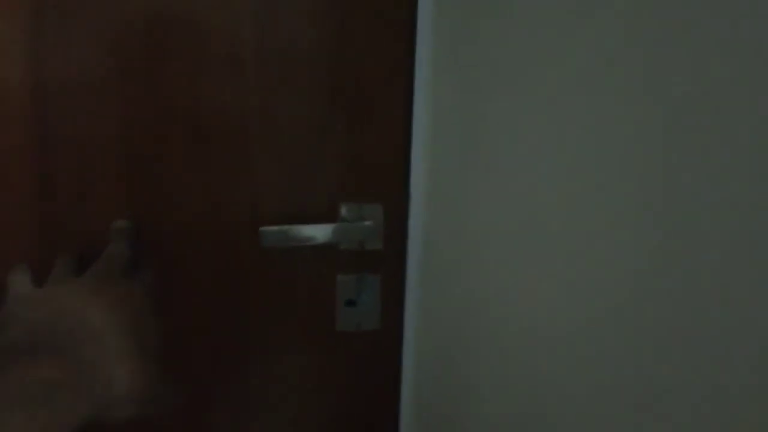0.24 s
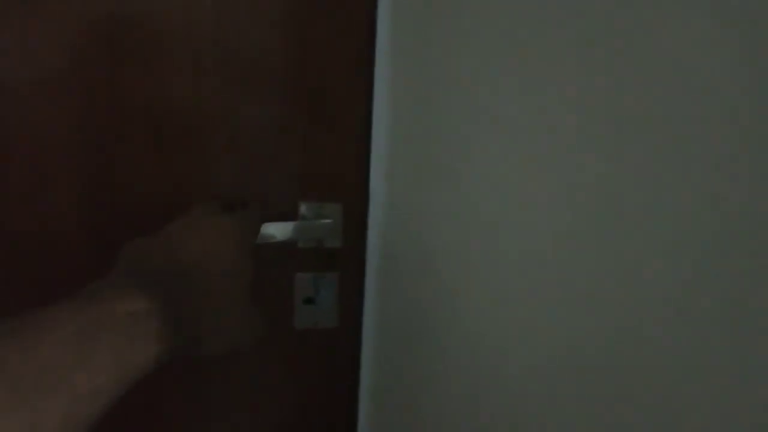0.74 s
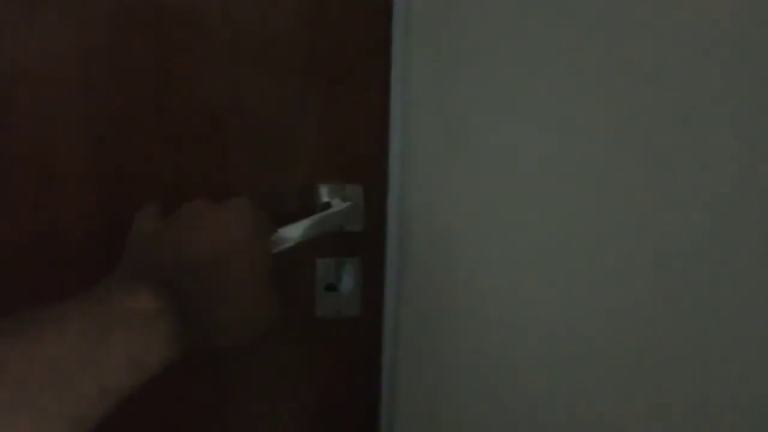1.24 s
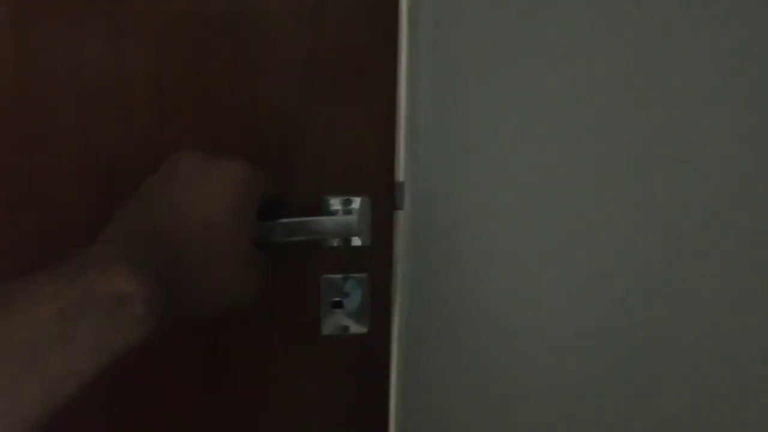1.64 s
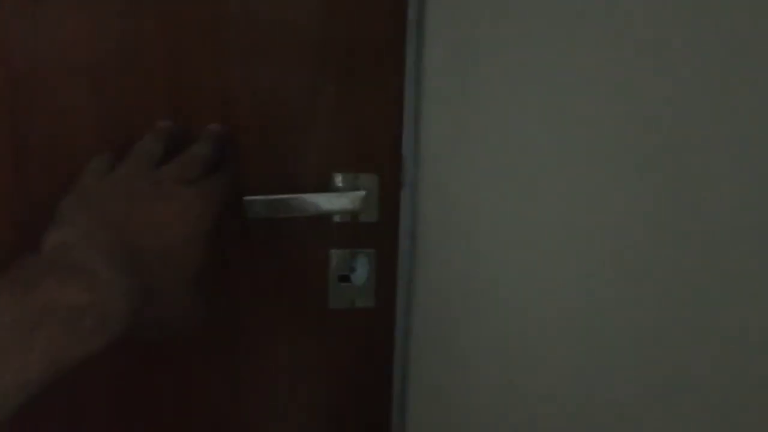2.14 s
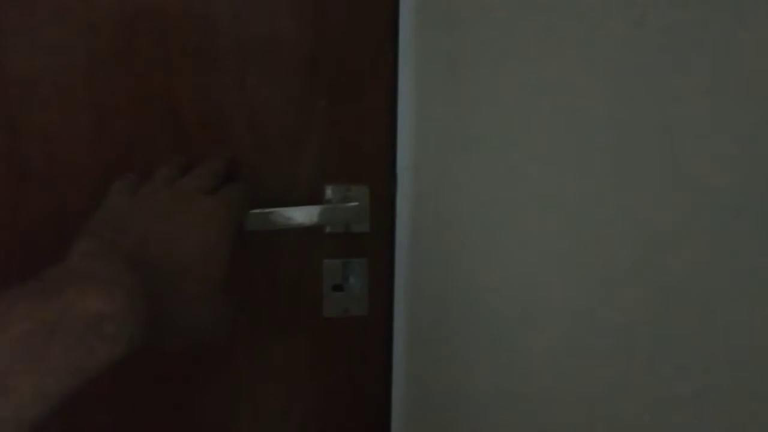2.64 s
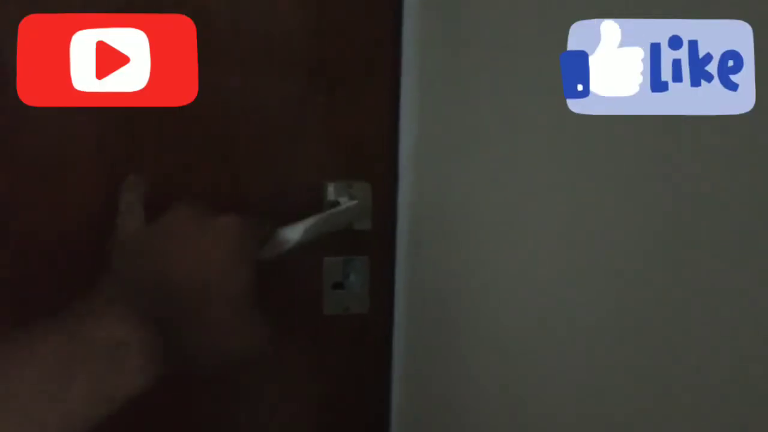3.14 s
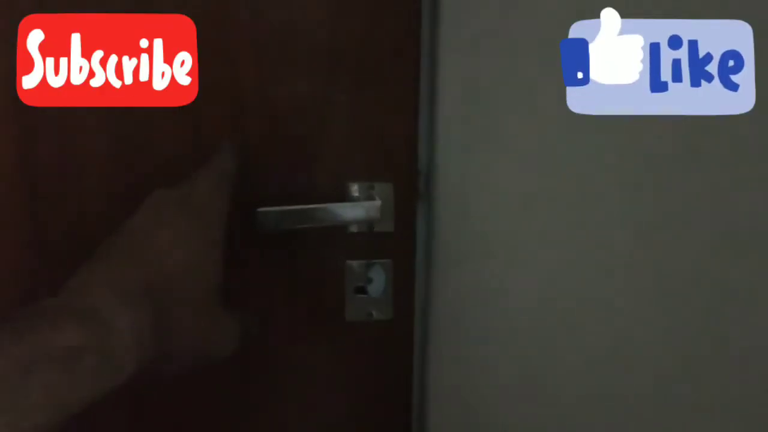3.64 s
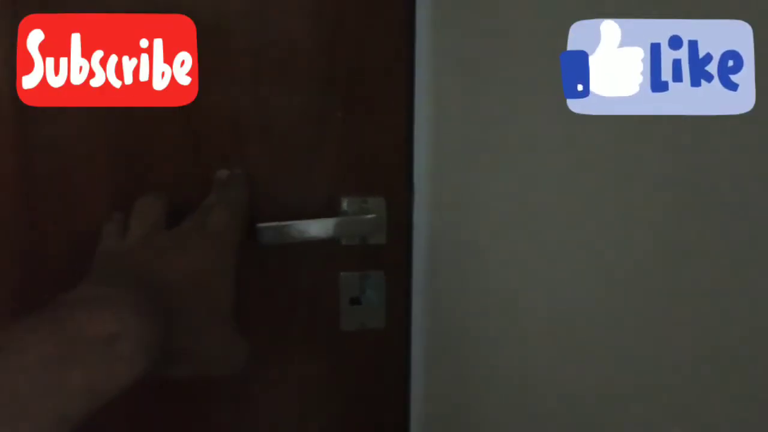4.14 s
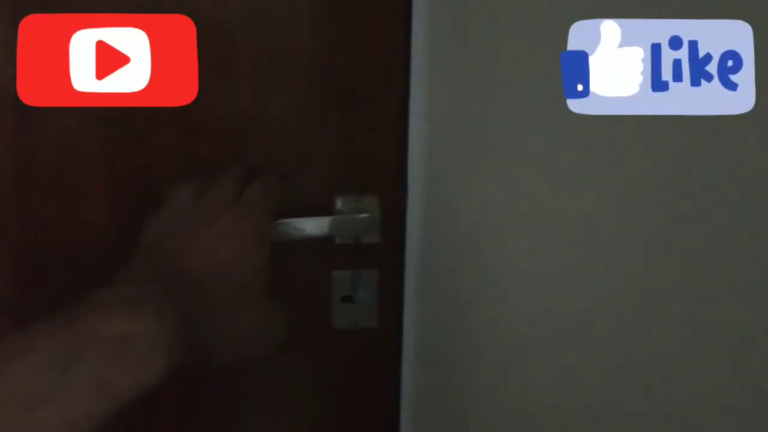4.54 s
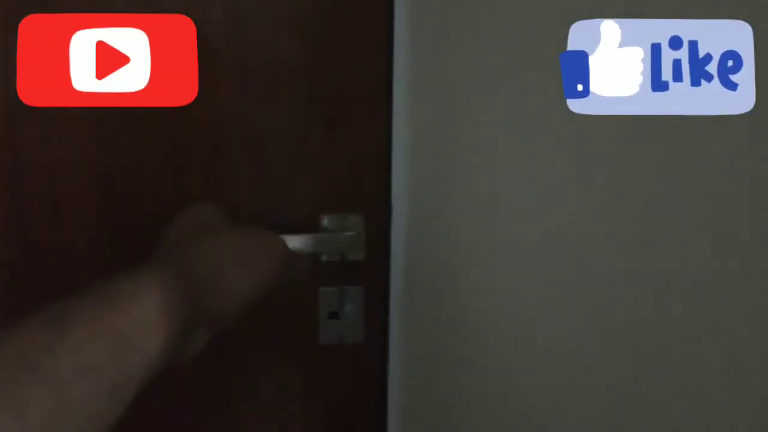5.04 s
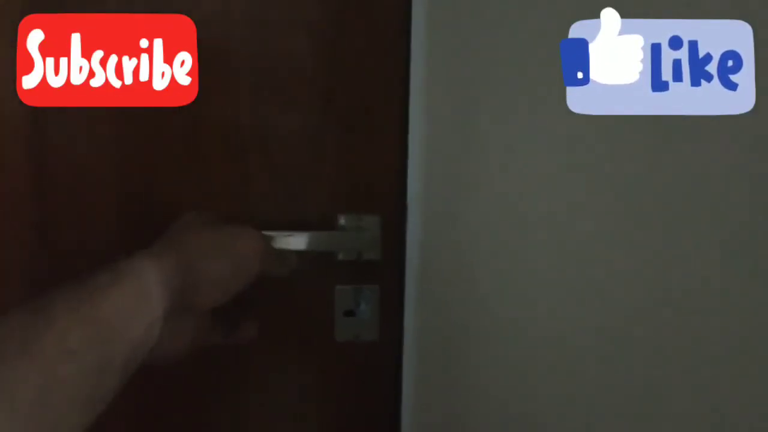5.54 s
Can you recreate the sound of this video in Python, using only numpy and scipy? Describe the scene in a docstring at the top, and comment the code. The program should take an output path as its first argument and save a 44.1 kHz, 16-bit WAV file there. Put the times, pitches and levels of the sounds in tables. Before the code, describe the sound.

A hand fumbles at a door handle with dull wooden taps and thin, barely audible hinge squeaks. The latch releases with a crisp metallic crack, the door bumps shut and the bolt clacks home; then the same again. Short indoor reverberation, scraping slips, soft bumps on the recorder body, quiet room tone, and a lone click near the end.

```python
"""A wooden door is opened by its lever handle and pushed shut, twice, in a small hard room.
A hand-held camera with two microphone ports stands close. Each blow is noise and a push that ring the wood,
crack in the metal latch and thud in the leaf. Slips rub in the wood, grit scrapes, wavering sines squeak
in the hinge; soft bumps, rumble, room tone and hiss lie beneath. The camera widens its stereo by
subtracting from each port the delayed sound of the other."""
import sys
import numpy as np
from scipy import signal
from scipy.fft import rfft, irfft, next_fast_len
from scipy.io import wavfile
from scipy.ndimage import uniform_filter1d

SR = 44100
rng = np.random.default_rng(int(sys.argv[2]) if len(sys.argv) > 2 else 0)


def to_wav(s):
    """Save 16-bit WAV."""
    ch = np.atleast_2d(s).T  # columns
    pcm = np.round(np.clip(ch, -1, 1) * 32767)  # PCM
    wavfile.write(sys.argv[1], SR, pcm.astype(np.int16))


N = 255144
T = np.arange(N) / SR
LONG = next_fast_len(N)
CROSS_LAG, CROSS_GAIN = 20, 0.74  # delay in samples and share of the other port that is subtracted


def undb(db):
    """Turn dB into an amplitude factor."""
    return 10 ** (np.asarray(db) / 20)


def heard(x):
    """What is left of a centred sound after the ports cancel each other."""
    return x - CROSS_GAIN * np.roll(x, CROSS_LAG, axis=-1)


def level(x, db):
    """Set the rms that passes the ports."""
    return x * undb(db) / np.sqrt(np.mean(heard(x) ** 2))


def peak(x, db):
    """Set the peak that passes the ports."""
    return x * undb(db) / np.abs(heard(x)).max()


def pan(db):
    """Left and right factors that make the left port louder than the right by this many dB."""
    return undb(np.array([[db], [-db]]) / 2)


def add(out, x, s):
    """Mix x in at s seconds."""
    i = int(s * SR)
    out[..., i:i + x.shape[-1]] += x[..., :N - i]


def along(table, hz):
    """Read a (Hz, value) table on a log axis."""
    f, v = np.transpose(table)
    return np.interp(np.log(hz + 1), np.log(f), v)


def colour(x, table):
    """Shape by a (Hz, dB) spectrum."""
    n = x.shape[-1]
    gain = undb(along(table, np.fft.rfftfreq(n, 1 / SR)))
    return irfft(rfft(x) * gain, n)


def swell(table):
    """One gain curve a row: it grows to its strongest moment and dies away, both exponentially."""
    s, db, rise, fall = np.transpose(table)[:4, :, None]
    time_constant = np.clip(np.where(T < s, rise, fall), .001, 2)
    return undb(db) * np.exp(-np.abs(T - s) / time_constant)


def ring(modes, scatter, centre_hz=None, octaves=1.25, size=SR // 4):
    """Response of a body; each blow lands elsewhere and favours the modes near its pitch."""
    hz, db, t60 = (c[:, None] for c in np.transpose(modes))
    t = np.arange(size) / SR
    shift, strength = scatter[:, :len(modes), None]
    near = 1 if centre_hz is None else 0.14 + np.exp(-(np.log2(hz / centre_hz) / octaves) ** 2)
    # neighbouring modes move in opposite sense
    near = near * (-1) ** np.arange(len(modes))[:, None]
    # the panel takes a moment to fill
    near = near * (1 - np.exp(-t / 0.00085))
    decay = undb(db + 2.4 * strength - 60 * t / t60)
    tones = np.sin(2 * np.pi * hz * (1 + 0.026 * shift) * t)
    return (near * decay * tones).sum(0)


# How alike the diffuse sound is at the two ports. Each row: frequency in Hz, likeness 0-1.
PORT_LIKENESS = [(60, 0.84), (300, 0.94), (1000, 0.04), (2000, 0), (4000, 0.04)]


def two_ports(noise, alike):
    """Mid and side from two noises, weighted by the likeness in each band."""
    c = np.clip(along(alike, np.fft.rfftfreq(noise.shape[1], 1 / SR)), 0, 1)
    mid, side = irfft(rfft(noise) * np.sqrt([1 + c, 1 - c]), noise.shape[1])
    return np.array([mid + side, mid - side]) / 2


# Decay of the small hard room. Each row: band centre in Hz, time to fall 60 dB in seconds.
ROOM_DECAY = [(100, 1), (400, 0.31), (1100, 0.3), (8000, 0.26), (15000, 0.17)]
ECHO_S = 0.0027  # the room answers after this


def room(x, wet_db, pan_db):
    """Add a diffuse tail: bands of noise, each with its own decay."""
    n = SR // 2
    t, f = np.arange(n) / SR, np.fft.rfftfreq(n, 1 / SR)
    noise = rfft(two_ports(rng.standard_normal((2, n)), PORT_LIKENESS))
    centres = [hz for hz, _ in ROOM_DECAY]
    tail = 0
    for own, (_, t60) in zip(np.eye(len(ROOM_DECAY)), ROOM_DECAY):
        # each band fades over into its neighbours
        band = irfft(noise * along(list(zip(centres, own)), f), n)
        tail = tail + band * undb(-60 * t / t60)
    onset = np.clip((t - ECHO_S) / 0.00047, 0, 1)
    tail *= onset / np.sqrt(np.sum(tail ** 2) / 2)
    source = np.tile(x.mean(0), (2, 1))
    wet = signal.fftconvolve(source, tail, axes=1)[:, :N]
    return x + undb(wet_db) * pan(pan_db) * wet


# Room tone and hiss at the microphone. Each row: frequency in Hz, relative level in dB.
AIR_COLOUR = [(25, -35), (60, -5), (130, 3), (300, -12.5), (1300, -22), (2500, -22.5), (9000, -38.5),
              (14000, -30),]
AIR_DB = -60.5  # rms of the mid after the ports cancel
# The hand-held body rumbles. Each row: time in seconds, rms of the mid in dB before panning.
RUMBLE_LEVEL = [(0, -50), (.5, -64.5), (2.0, -67.5), (3.3, -66), (3.5, -50.5), (4.3, -57.5), (4.7, -62),
                (5.25, -52), (5.7, -59.5)]


def air():
    """Room tone and microphone hiss as coloured noise, and a swelling low rumble."""
    tone = colour(two_ports(rng.standard_normal((2, LONG)), PORT_LIKENESS), AIR_COLOUR)[:, :N]
    low_colour = [(30, -2.5), (60, -3.5), (150, -11.0), (300, -12.0), (600, -55)]
    low = colour(two_ports(rng.standard_normal((2, LONG)), PORT_LIKENESS), low_colour)[:, :N]
    tone *= undb(AIR_DB) / np.std(heard(tone.mean(0)))
    rumble_gain = undb(np.interp(T, *np.transpose(RUMBLE_LEVEL)))
    return tone + pan(1.3) * low * rumble_gain / np.std(heard(low.mean(0)))


# Fingers shift on the camera body, nearer the left port.
# Each row: start in seconds, peak in dB before panning, pitch in Hz.
FINGER_BUMPS = [(3.456, -40, 130), (3.548, -42.5, 164), (3.614, -34, 168), (3.643, -46, 121),
                (3.927, -46, 153)]


def bumps():
    """Soft pushes of about one cycle through the body."""
    out = np.zeros((2, N))
    t = np.arange(2048) / SR
    for s, db, hz in FINGER_BUMPS:
        cycle = np.sin(2 * np.pi * hz * t) * (t * hz) ** 2 * np.exp(-t * hz / 0.32)
        add(out, pan(23.2) * peak(cycle, db), s)
    return out


# Hinge squeals, highest and loudest at the fastest swing.
# Each row: fastest moment in seconds, top pitch in Hz, relative level in dB, swell in seconds,
# fade in seconds, roughness 0-1.
HINGE_SQUEALS = [(0.279, 15100, -56, 0.11, 0.11, 0.98), (.375, 15300, -56, .015, 0.063, 0.06),
                 (.44, 14200, -59, 0.021, 0.028, 0), (0.521, 14400, -56.5, 0.039, 0.074, 0.15),
                 (3.09, 12900, -69, .03, .04, 0.2), (5.025, 12200, -76, 0.12, 0.039, .3)]
# Strands of one squeal. Each row: multiple of the pitch, share of the pitch it wavers by when rough.
SQUEAL_STRANDS = [(1, .02), (.96, .012), (.91, .012), (.82, .015), (.76, .015)]
STRAND_DB, SMOOTH_DB = -6, -16  # each further strand is weaker; smooth squeals lose them
SQUEAL_END_DB = -23  # gain change one swell or fade time from the top
SAG_HZ_PER_S, SAG_ROUND_S = 42000, .035  # pitch falls away on both sides of a rounded top
CREAK_S, CREAK_HZ, CREAK_DB, CREAK_HALF_S = 0.653, 905, -62, 0.25  # low hinge note


def hinge():
    """Wavering near-sines; the squeals glide with the swing of the door, the creak holds its pitch."""
    out = np.zeros(N)
    notes = []
    for s, top_hz, db, rise, fall, rough in HINGE_SQUEALS:
        sag = SAG_HZ_PER_S * (np.hypot(T - s, SAG_ROUND_S) - SAG_ROUND_S)
        notes.append((s, top_hz - sag, db, np.where(T < s, rise, fall), rough, SQUEAL_STRANDS))
    notes.append((CREAK_S, CREAK_HZ, CREAK_DB, CREAK_HALF_S, 1, [(1, 0.014)]))
    for s, hz, level_db, half, rough, strands in notes:
        gain = undb(level_db + SQUEAL_END_DB * ((T - s) / half) ** 2)
        for k, (multiple, waver) in enumerate(strands):
            shake, flutter = uniform_filter1d(rng.standard_normal((2, N)), size=120, axis=1) * np.sqrt(120)
            turn = np.cumsum(multiple * hz * (1 + rough * waver * shake)) / SR
            db = k * STRAND_DB + (k > 0) * (1 - rough) * SMOOTH_DB
            out += gain * undb(db + 5 * flutter) * np.sin(2 * np.pi * turn)
    return out


# Colour of the metal latch, for grit and cracks. Each row: frequency in Hz, relative level in dB.
LATCH_COLOUR = [(1200, 5), (2200, 5), (3200, 2), (5000, -2.5), (7500, -10), (10000, -10), (14000, -8.5)]
# Grit scrapes in the metal, skin and cloth brush past.
# Each row: strongest moment in seconds, relative level in dB, swell in seconds, fade in seconds,
# airy share 0-1.
SCRAPE_STROKES = [(.28, -55, 0.045, 0.084, 0.43), (.48, -70, 0.027, 0.39, 0.35),
                  (1.182, -64, 0.1, 0.015, 0.27), (1.398, -60.5, 0.026, 0.038, 0),
                  (1.9, -58.5, 0.046, 0.077, 0.92), (2.299, -56.5, 0.13, 0.023, 0.4),
                  (2.347, -38.5, 0.0069, 0.051, 0.38), (3.171, -55.5, 0.0084, 0.078, 0.56),
                  (3.375, -60.5, 0.0047, 0.1, 0), (4.032, -40.5, 0.013, 0.039, 0.5)]


def scrapes():
    """Fine grit with the colour of the latch, and a thin airy brush above it."""
    uneven = undb(0.96 * rng.exponential(size=LONG))
    grit = two_ports(rng.standard_normal((2, LONG)) * uneven, PORT_LIKENESS)
    dull = level(colour(colour(grit, LATCH_COLOUR), [(4000, -9.0), (15000, -12.0)]), 12.9)
    airy = level(colour(grit, [(5000, -22), (10000, -5.0), (14000, 3)]), 5.0)
    # the contact catches and lets go
    patchy = undb(2.35 * uniform_filter1d(rng.standard_normal(N), size=600) * np.sqrt(600))
    gains = swell(SCRAPE_STROKES)
    share = np.clip(np.transpose(SCRAPE_STROKES)[4], 0, 1)
    mix = (1 - share) @ gains * dull[:, :N] + share @ gains * airy[:, :N]
    return mix * patchy * pan(-1.9)


# Modes of the wood, for rubs and knocks; each blow scatters pitch and level.
# Each row: frequency in Hz, relative level in dB, time to fall 60 dB in seconds.
WOOD_MODES = [(271, 9, 0.047), (362.2, 2, 0.13), (416, 1, 0.056), (499, 2.5, 0.025), (665, -1.5, 0.05),
              (782.5, 4, 0.023), (876, 7.5, 0.015), (951.5, 3.5, 0.036), (1018.6, 2, 0.041),
              (1160, 10, 0.013), (1352, 0, 0.058), (1392, 3.5, 0.032), (1750, 0, 0.012)]
# Strokes of sliding in the lock and at the frame, heard through the wood.
# Each row: strongest moment in seconds, relative level in dB, swell in seconds, fade in seconds, pitch in Hz.
RUB_STROKES = [(0.549, -64, 0.26, 0.78, 700), (1.108, -42.5, 0.021, 0.03, 670),
               (1.17, -51.5, 0.015, 0.014, 780), (1.426, -48.5, 0.0087, 0.032, 417),
               (1.485, -50, 0.026, 0.037, 292), (1.86, -66.5, 0.047, 0.17, 960),
               (2.269, -41.5, 0.056, 0.015, 650), (2.6, -66, 0.24, 1, 467), (3.17, -54, 0.066, 0.022, 744),
               (3.438, -52, 0.011, 0.15, 570), (3.87, -49, 0.022, 0.054, 554),
               (4.035, -42, 0.011, 0.0058, 770), (5.18, -59, 0.25, 0.28, 390)]


def rubs():
    """Uneven slips ring the modes of the wood near the pitch of the slide."""
    chosen = rng.standard_normal(N) * (rng.random(N) < 800 / SR)  # about 800 slips a second
    slips = chosen * undb(2.14 * rng.exponential(size=N))
    gains, hz = swell(RUB_STROKES), np.transpose(RUB_STROKES)[4]
    no_scatter = np.zeros((2, len(WOOD_MODES)))
    out = 0
    for centre in 330 * np.sqrt(2) ** np.arange(5):
        body = ring(WOOD_MODES, no_scatter, centre, octaves=0.44, size=4096)
        part = signal.fftconvolve(slips, body)[:N]
        nearness = np.exp(-(np.log2(hz / centre) / 0.7) ** 2)
        out = out + level(part, 0) * (nearness @ gains)
    return out * pan(8.1)


# Modes of the door leaf. Each row: frequency in Hz, relative level in dB, time to fall 60 dB in seconds.
LEAF_MODES = [(67.03, 4.5, 0.27), (155.35, -1.5, 0.23), (251, 9.5, 0.069), (354, 1.5, 0.27)]
# Blows of latch, handle and leaf, close to the camera; peaks are set before panning and room.
# Each row: start in seconds, knock peak in dB, knock pitch in Hz, crack peak in dB, thud peak in dB,
# contact length in seconds (held to 0.0005-0.02), crack brightness as gain in dB at 10950 Hz.
DOOR_BLOWS = [(0.001, -33, 428, -49, -62, 0.0065, -8), (0.044, -26, 494, -54.5, -30.5, 0.026, 4),
              (0.277, -49, 850, -38.5, -42.5, 0.002, -1), (0.332, -26, 680, -47.5, -37.5, 0.013, -2),
              (1.07, -32.5, 670, -53.5, -37.5, 0.014, -8), (1.189, -25, 1090, -13, -70, 0.0044, 15.5),
              (1.414, -46, 382, -54, -37, 0.012, -10), (1.872, -34, 1080, -52.5, -79, 0.0023, 5),
              (2.077, -14.5, 990, -23.5, -30.5, 0.0017, -48), (2.086, -14.5, 730, -48, -21, 0.004, 13),
              (2.258, -20.5, 816, -46, -39, 0.011, 0), (2.3571, -11.5, 960, -17, -55, 0.0052, -11),
              (2.3659, -17, 986, -14, -13, 0.0022, 5), (2.381, -41, 980, -24.5, -39, 0.0051, 7.5),
              (2.63, -42, 890, -55, -77, 0.0057, 0), (3.067, -31, 635, -55, -38.5, 0.023, 5),
              (3.12, -31, 696, -55.5, -38.5, 0.0068, 5), (3.1932, -22.5, 1100, -11, -70, 0.0029, 16),
              (3.371, -59, 900, -49, -67, 0.0027, -1), (3.411, -19, 1080, -30, -35, 0.0058, -19.5),
              (3.7285, -13, 1070, -22, -43, 0.0024, -12), (3.7376, -13.5, 780, -56, -28.5, 0.0025, -6),
              (4.034, -18, 870, -22, -24, 0.0099, -2.5), (4.045, -12.5, 964, -23.5, -34, 0.0021, -15),
              (4.0503, -22, 870, -35, -14.5, 0.0013, -18), (4.059, -30, 900, -22.5, -17, 0.0044, 11),
              (4.104, -46, 890, -43, -59, 0.0011, -13), (5.1587, -22, 1010, -31, -37, 0.0013, -0.5),
              (5.163, -25.5, 1040, -44, -35.5, 0.0026, -7), (5.493, -33.5, 760, -54, -34.5, 0.0074, -17)]
PUSH_S, SNAP_S = .00025, .0003  # time constants of the first push and of the snap


def blows():
    """A short chatter of contacts drives wood, latch and leaf."""
    wood, metal, leaf = np.zeros((3, 2, N))
    t = np.arange(2048) / SR
    above = np.log2(1 + np.fft.rfftfreq(2048, 1 / SR) / 10950.0)
    chance = rng.standard_normal((len(DOOR_BLOWS), 4, 2048))
    for (s, knock_db, hz, crack_db, thud_db, contact, bright_db), draw in zip(DOOR_BLOWS, chance):
        contact = np.clip(contact, .0005, .02)
        fade = np.exp(-t / contact)

        # wood yields: the longer the contact, the slower the chatter grows
        push = t / PUSH_S * np.exp(-t / PUSH_S)
        force = push + 0.27 * draw[0] * fade * np.minimum(t / (0.2 * contact), 1)
        knock = signal.fftconvolve(force, ring(WOOD_MODES, draw[2:], hz, octaves=0.47))
        add(wood, pan(3.7) * peak(knock, knock_db), s)

        # metal rattles and snaps, more sharply in a bright blow
        snap = np.roll(np.sign(draw[1]) * np.exp(-t / SNAP_S), int(.001 * SR))
        # the wall beside the lock throws the snap back
        snap = snap + 0.37 * np.roll(snap, int(0.0027 * SR))
        rattle = draw[1] * fade * np.minimum(t / 0.002, 1)
        burst = rfft(rattle + undb(0.28 * bright_db) * snap)
        # flatten the broad spectrum of the short noise burst, so that its tail has no chance bands
        burst /= np.sqrt(uniform_filter1d(np.abs(burst) ** 2, size=32))
        crack = colour(irfft(burst * undb(bright_db * above)), LATCH_COLOUR)
        add(metal, pan(-22.5) * peak(crack, crack_db), s)

        # the whole leaf gives way over a few milliseconds, and the harder the blow the deeper it sounds
        give = np.hanning(int(0.0035 * SR))
        thud_hz = 330 * undb(-0.4 * (thud_db + 41.5))
        body = ring(LEAF_MODES, draw[2:], thud_hz, octaves=2.25, size=SR // 2)
        add(leaf, pan(3.1) * peak(signal.fftconvolve(give, body), thud_db), s)
    return wood, metal, leaf


def scene():
    """Set the door in its room, with the scrapes, hinge, bumps and air added without the room tail."""
    wood, metal, leaf = blows()
    door = room(wood + rubs(), -4.0, 0.61)
    door = door + room(metal, -0.19, -1.0)
    door = door + room(leaf, -11.5, 0.65)
    return door + scrapes() + pan(-2.2) * hinge() + bumps() + air()


def record(dry):
    """Each side loses the delayed other side, then bottom and top are cut."""
    late = np.pad(dry, ((0, 0), (CROSS_LAG, 0)))[::-1, :N]
    low_cut = signal.butter(2, 44.2, "high", fs=SR, output="sos")
    high_cut = signal.ellip(12, .3, 70, 15900, fs=SR, output="sos")
    wide = signal.sosfilt(low_cut, dry - CROSS_GAIN * late)
    return signal.sosfilt(high_cut, wide)


dry = scene()
out = record(dry)
to_wav(out)
```